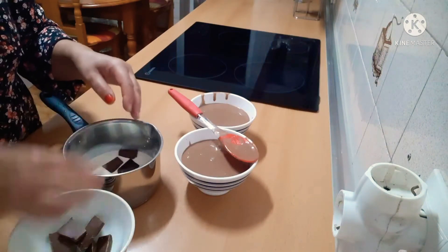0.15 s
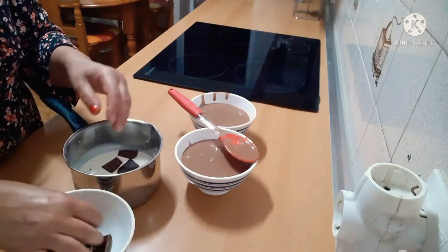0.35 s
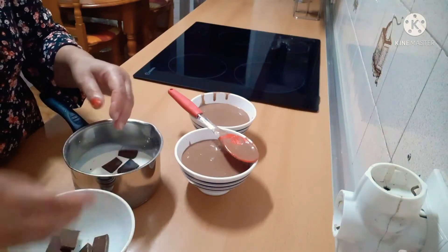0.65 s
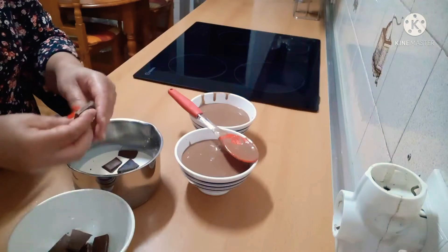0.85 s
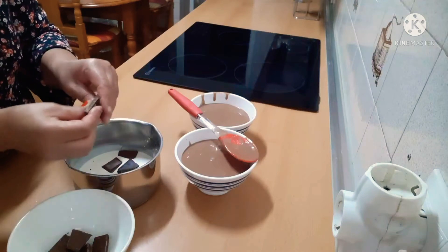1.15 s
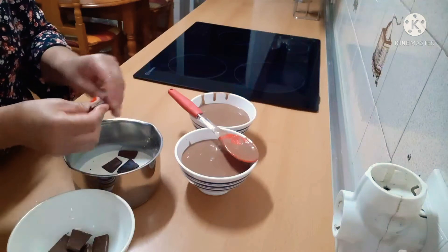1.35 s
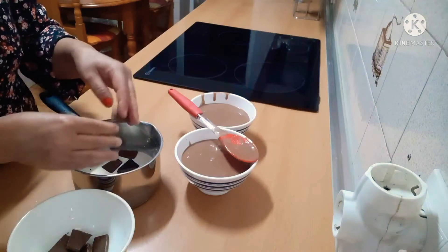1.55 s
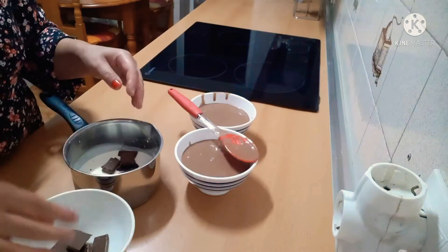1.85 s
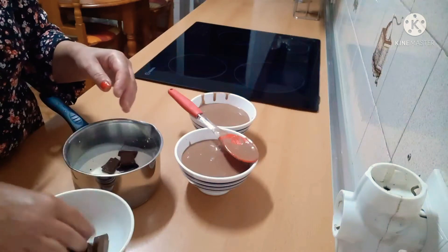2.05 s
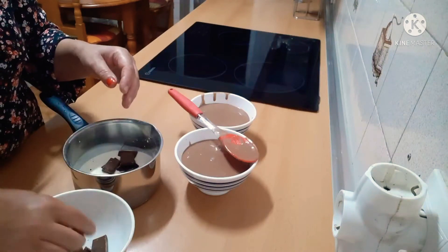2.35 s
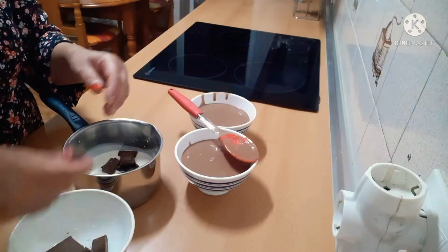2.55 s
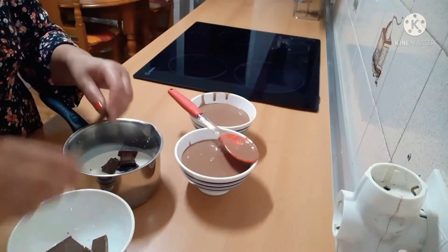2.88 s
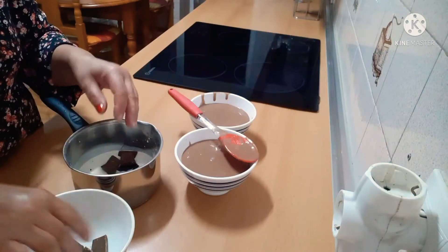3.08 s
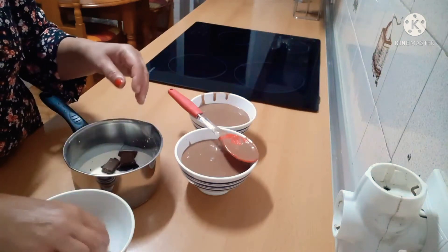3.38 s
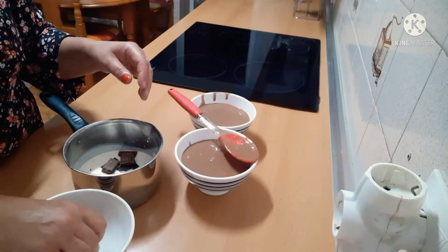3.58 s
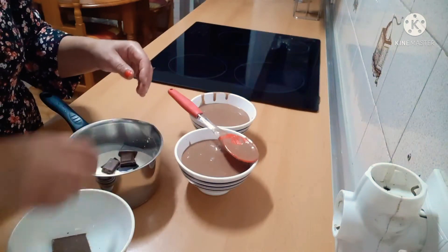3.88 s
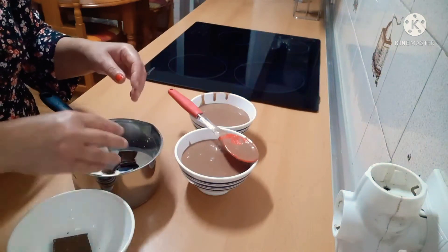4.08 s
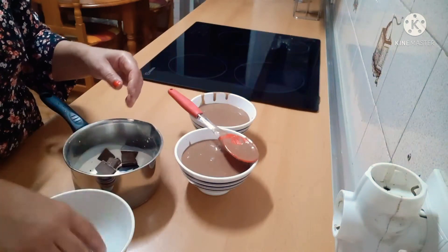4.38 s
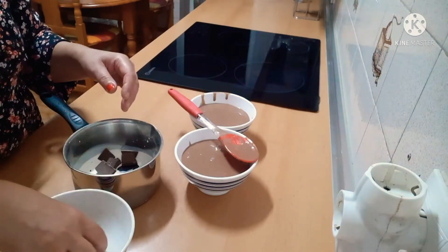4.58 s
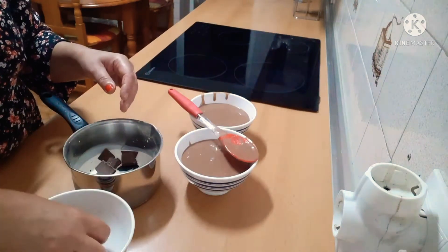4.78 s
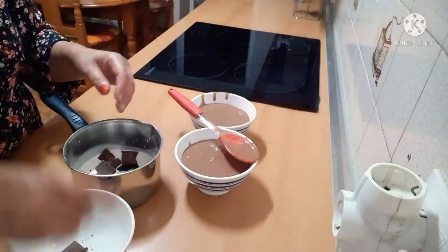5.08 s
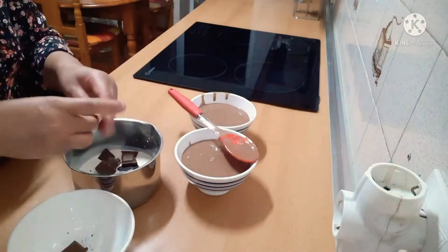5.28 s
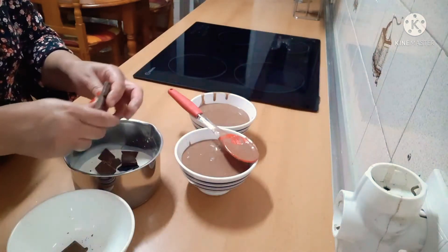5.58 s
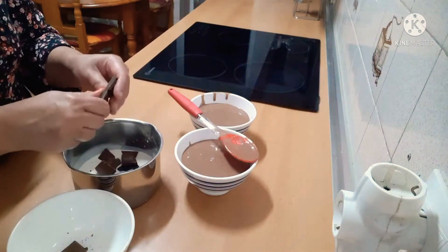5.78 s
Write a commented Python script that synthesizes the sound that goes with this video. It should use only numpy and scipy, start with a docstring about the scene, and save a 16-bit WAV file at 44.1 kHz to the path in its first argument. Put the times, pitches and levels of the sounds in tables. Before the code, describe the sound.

Chocolate pieces snap sharply and clack into a steel saucepan, with china bowl knocks and faint rummaging over a low fridge hum.

```python
"""Sharp cracks, knocks and faint rummaging over a low hum: squares of chocolate are picked out of a china
bowl, snapped and dropped into a steel saucepan on a kitchen counter.
Every blow is a click with a trail of grit that also rings the pan or bowl and drums the counter.
A tiled room smears the blows, a fridge motor beats against the mains hum, and faint chirps come from
far off. A phone with two ports (microphone openings) listens."""
import sys
import numpy as np
from scipy import signal
from scipy.fft import rfft, irfft
from scipy.io import wavfile
from scipy.ndimage import uniform_filter1d, map_coordinates

SR = 44100
rng = np.random.default_rng(int(sys.argv[2]) if len(sys.argv) > 2 else 0)


def store_wav(level_fs):
    """Save 16-bit WAV to argv[1]."""
    pcm = np.round(np.clip(np.atleast_2d(level_fs), -1, 1) * 32767)
    wavfile.write(sys.argv[1], SR, pcm.T.astype(np.int16))


N = 261954
T = np.arange(N) / SR  # time of every sample, in seconds

# notes of the struck counter: (pitch [Hz], relative level [dB], time to fall by 60 dB [s])
COUNTER_MODES = [(149.1, -11.5, 0.11), (184, -1.5, 0.065), (279, -13, 0.072), (313, -7, 0.094),
                 (407.7, -3.5, 0.1), (518.3, 4, 0.059), (644.8, 1.5, 0.074), (805, 2, 0.013),
                 (861.5, -1, 0.037), (1031, 2, 0.018), (1167, -4, 0.024)]
# what rings close to the phone stirs the room less than a crack does
RING_SEND_DB, COUNTER_SEND_DB = -16, -9.5


def undb(db):
    """Turn decibels into a plain multiplier."""
    return 10 ** (np.asarray(db) / 20)


def unit(x):
    """Scale a sound to an average (RMS) level of 1."""
    return x / np.sqrt(np.mean(x ** 2, axis=-1, keepdims=True))


def along(table, hz):
    """Read a (pitch, value) table between its rows, on a log-frequency axis."""
    f, v = np.transpose(table)
    return np.interp(np.log(np.maximum(hz, 1)), np.log(f), v)


def fall(t, t60):
    """A fading level that drops by 60 dB in t60 seconds."""
    return np.exp(-np.log(1000) * t / t60)


def swell(s, length):
    """A level that rises from zero and sinks back, starting at s and lasting length seconds."""
    return np.sin(np.pi * np.clip((T - s) / length, 0, 1))


def band(x, lo_hz, hi_hz):
    """Keep mainly what lies between two pitches."""
    return signal.sosfilt(signal.butter(2, [lo_hz, hi_hz], "band", fs=SR, output="sos"), x)


def octave_share(hz, centre_hz):
    """Share of each pitch in one octave band; neighbouring bands overlap and add up to 1."""
    return np.clip(1 - np.abs(np.log2(np.maximum(hz, 1) / centre_hz)), 0, 1)


def walk(rate):
    """Random levels held for 1 / rate seconds and smoothed twice; spread near 1."""
    k = int(SR / rate)
    steps = np.repeat(rng.standard_normal(N // k + 1), k)
    return 1.26 * uniform_filter1d(uniform_filter1d(steps, k), k)[:N]


def pair(n):
    """Spectra of a left and a right noise: alike in the bass, mostly unrelated higher up."""
    # (pitch [Hz], likeness of left and right [0 to 1])
    likeness = [(130, 1), (290, 0.64), (640, 0.25), (1400, 0.16), (3000, 0.011), (15000, 0.247)]
    hz = np.fft.rfftfreq(n, 1 / SR)
    c = np.clip(along(likeness, hz), -1, 1)
    mid, side = rfft(rng.standard_normal((2, n)))
    mid = mid * np.sqrt((1 + c) / 2)
    side = side * np.sqrt((1 - c) / 2)
    return hz, np.array([mid + side, mid - side])


def causal(db):
    """Short response with the given gains over frequency; folding the cepstrum keeps it from starting early."""
    half = db.shape[-1] - 1
    cep = irfft(np.log(undb(db)))
    cep[..., 1:half] *= 2
    cep[..., half + 1:] = 0
    return irfft(np.exp(rfft(cep)))


def fridge():
    """The motor slips behind the mains, so their second multiples beat; narrow noise bands are the casing's drone."""
    # steady tones: (multiple of the base pitch, level [dB])
    motor_tones = [(1, -72.5), (2, -56.5), (3, -63), (5, -74), (21, -80)]
    mains_tones = [(1, -64), (2, -59.5), (3, -90.5), (4, -67)]
    # (pitch [Hz], width [Hz], level [dB])
    drone_bands = [(65.8, 6.4, -66), (148.8, 2.3, -89.5), (318, 5.1, -75.5), (415, 28, -72.5),
                   (577.7, 13, -81), (1046, 28.4, -107.5)]
    motor_hz, mains_hz = 48.98, 50.005
    t = T - .042  # at .042 s the second multiples cancel most
    motor = sum(undb(db) * np.sin(2 * np.pi * k * motor_hz * t) for k, db in motor_tones)
    mains = sum(undb(db) * np.sin(2 * np.pi * k * mains_hz * t) for k, db in mains_tones)
    drone = sum(undb(db) * unit(band(rng.standard_normal(N), f - w / 2, f + w / 2))
                for f, w, db in drone_bands)
    return np.sqrt(2) * (motor - mains) + drone


def air():
    """The quiet of the kitchen: noise in octave bands that swell a little, each on its own."""
    # (pitch [Hz], relative level per Hz [dB])
    air_colour = [(20, -11), (45, 0), (75, -12), (120, 3), (200, -8), (350, -18), (700, -21), (1500, -30.5),
                  (2800, -37.5), (6000, -36.5), (16000, -44)]
    air_db = -57  # average level
    hz, noise = pair(N)
    noise = noise * undb(along(air_colour, hz))
    out = 0
    for f in 30 * 2. ** np.arange(10):
        swelling_db = 3.2 * walk(3.67) + 0.7 * walk(3.56)
        out = out + irfft(noise * octave_share(hz, f), N) * undb(swelling_db)
    return undb(air_db) * out / np.sqrt(np.mean(out ** 2))


def bumps():
    """Soft bumps of an arm: each slow push rocks the counter at one low note."""
    # (time [s], length [s], pitch [Hz], level [dB])
    arm_bumps = [(.0, 0.11, 119, -41.5), (1.7, 0.2, 97.5, -39.5), (1.75, 0.154, 133.2, -46.5),
                 (2.504, 0.28, 44.4, -46), (2.517, 0.17, 128, -48)]
    return sum(swell(s, length) * undb(db) * np.sin(2 * np.pi * hz * (T - s))
               for s, length, hz, db in arm_bumps)


def ring(modes, t, scatter_db):
    """One blow on a set of fading notes, each met with its own strength, sign and slight mistuning; peak 1."""
    hz, db, t60 = np.transpose(modes)[:, :, None]
    sign, strength, detune = rng.standard_normal((3, len(modes), 1))
    level = np.sign(sign) * undb(db + scatter_db * strength)
    notes = level * np.sin(2 * np.pi * hz * (1 + 0.005 * detune) * t) * fall(t, t60)
    y = np.sum(notes, axis=0)
    return y / np.max(np.abs(y))


def follow(rule, crack_db, ring_db=0):
    """A level set by the crack and ring: rule is (offset dB, dB per dB of crack, dB per dB of ring)."""
    return rule[0] + rule[1] * crack_db + rule[2] * ring_db


def blows(rows, vessel, clack, rock_s, shoulder_db, grit_t60, scatter_db):
    """Each blow is a coloured click with gritty trail; it rings the vessel, and the rocking piece drums the counter."""
    # broad thud of one contact: (pitch [Hz], relative level [dB])
    contact_thud = [(80, 14.5), (300, 21.5), (900, 2.5), (1500, 17), (2500, -10.5), (8000, -17.5)]
    t = np.arange(SR // 3) / SR
    to_room, near = np.zeros(N + SR), np.zeros((2, N + SR))
    hz = np.fft.rfftfreq(512, 1 / SR)
    for s, crack_db, crack_hz, edge_db, counter_db, ring_db, pan_db in rows:
        clack_db = follow(clack, crack_db, ring_db)  # the lower, duller part of the click
        colour = [(90, clack_db - 7), (300, clack_db + 14.0), (2500, clack_db + 10.5),
                  (0.76 * crack_hz, crack_db - 5.5), (crack_hz, crack_db + 3.5),
                  (1.41 * crack_hz, crack_db + shoulder_db),
                  (12000, edge_db + 17.0), (16000, edge_db + 2.0)]
        click = .1 * rng.standard_normal(len(t)) * fall(t, grit_t60)
        click[0] = 1
        crack = signal.fftconvolve(click, causal(along(colour, hz)))[:len(t)]
        # uneven contacts that grow and die out as the weight settles
        u = t / rock_s
        contacts = rng.standard_normal(len(t)) ** 3 * u * np.exp(-u)
        contacts /= np.sqrt(np.sum(contacts ** 2))
        # the landing: one firm contact
        contacts[int(rock_s * SR / 2)] += undb(1.0)
        thud = ring(COUNTER_MODES, t, scatter_db)
        thud[:512] += causal(along(contact_thud, hz))
        counter = undb(counter_db) * signal.fftconvolve(thud, contacts)[:len(t)]
        rings = undb(ring_db) * ring(vessel, t, scatter_db)
        i = int(s * SR)
        to_room[i:i + len(t)] += crack + undb(RING_SEND_DB) * rings + undb(COUNTER_SEND_DB) * counter
        left_right = undb(np.array([[pan_db], [-pan_db]]) / 2)
        near[:, i:i + len(t)] += (crack + rings + counter) * left_right
    return to_room[:N], near[:, :N]


def pan_drops():
    """Pieces snapped over the steel pan or landing in it: bright cracks with the pan's ring."""
    # (time [s], crack level before colouring [dB], crack pitch [Hz], bright edge before colouring [dB],
    #  pan ring [dB], left minus right [dB])
    pan_hits = [(0.0122, -22.5, 5070, -49, -42, -7), (0.0336, 0.5, 6540, -27.5, -47.5, -20.5),
                (0.0451, -29, 4840, -31, -35, 4), (0.0564, -18.5, 5600, -31, -31.5, -3),
                (0.0855, -26, 5340, -41, -50, 0), (0.1861, -25, 5000, -65, -43.5, 11),
                (1.26, -19, 4780, -36.5, -46, -3.5), (1.6792, -42.5, 5070, -79, -45, 7),
                (1.698, -37.5, 4400, -64, -39, -1.5), (1.7276, -27.5, 4600, -53, -38, 15.5),
                (1.7321, -18, 4260, -45.5, -28, -1), (1.7492, -24.5, 5360, -47, -33.5, -17),
                (1.8423, -33.5, 6100, -70, -40, -7), (1.8523, -31, 5300, -70, -44.5, -7),
                (1.8857, -49, 4330, -78, -48, -1), (3.091, -22, 5300, -53, -37, -2),
                (3.1007, -1.5, 5440, -39.5, -31, -4), (4.1836, -8.5, 5700, -39, -37.5, -11.5),
                (4.2224, -9.5, 5220, -33, -41.5, 15), (4.2492, -19.5, 4770, -58, -44, 9)]
    # notes of the pan: (pitch [Hz], relative level [dB], time to fall by 60 dB [s])
    pan_modes = [(1455, -6.5, 0.18), (1513, -3, 0.19), (1581, 0.5, 0.042)]
    clack, counter = (-8, 0.29, 0.39), (-27, 0.22, 0.23)  # rules for follow()
    rows = [(s, db, hz, edge_db, follow(counter, db, ring_db), ring_db, pan_db)
            for s, db, hz, edge_db, ring_db, pan_db in pan_hits]
    return blows(rows, pan_modes, clack, rock_s=0.00543, shoulder_db=0, grit_t60=0.0067, scatter_db=0.0)


def bowl_knocks():
    """Pieces knocking in the china bowl: harder cracks also brighten the edge and ring the bowl more."""
    # (time [s], crack level before colouring [dB], crack pitch [Hz], counter drive [dB], left minus right [dB])
    bowl_hits = [(0.3956, -44.5, 5000, -47, 13.5), (0.4228, -24, 4760, -27, -3),
                 (0.4902, -25.5, 4900, -41.5, 15), (0.5295, -38, 4750, -40.5, -12),
                 (2.103, -47, 4710, -40, 1.5), (2.151, -29.5, 4570, -35.5, 5),
                 (2.1652, -23.5, 4560, -18.5, 11), (2.387, -41.5, 4630, -45, 5),
                 (2.4526, -20.5, 4200, -26.5, 5), (3.3536, -47.5, 5030, -47, 0),
                 (3.4853, -58, 4330, -49.5, 11), (3.53, -53, 4950, -45, 8), (3.6031, -44, 4800, -42.5, 3),
                 (3.6891, -56, 5000, -43, 0), (3.7309, -43.5, 5560, -52, -3), (4.4568, -52, 5040, -49, -1),
                 (4.5125, -25.5, 4190, -38.5, 8), (4.5397, -47.5, 4400, -32, 5),
                 (4.5694, -43.5, 4590, -38, 3), (4.6052, -37, 4240, -43, -7),
                 (4.6269, -43, 4130, -35, 17.5), (4.741, -57, 4300, -40, 1),
                 (4.7699, -65, 4600, -41.5, -11), (4.8494, -51, 4990, -49.5, 0),
                 (4.8804, -28, 4244, -43, -1), (4.93, -44, 4230, -44.5, -18.5)]
    # notes of the bowl: (pitch [Hz], relative level [dB], time to fall by 60 dB [s])
    bowl_modes = [(1930, -10, .02), (2054, 39, 0.063), (2350, -34, 0.1), (2510, -48, 0.049)]
    clack, edge, ringing = (-0.5, 1.194, 0), (-28.5, 0.89, 0), (-16, 1.064, 0)  # rules for follow()
    rows = [(s, db, hz, follow(edge, db), counter_db, follow(ringing, db), pan_db)
            for s, db, hz, counter_db, pan_db in bowl_hits]
    return blows(rows, bowl_modes, clack, rock_s=0.00715, shoulder_db=-7, grit_t60=0.011, scatter_db=1.5)


def rummage():
    """Fingers among the pieces: small random contacts, some firmer, drum the counter through the bowl and tick."""
    # (time [s], length [s], level of the smallest contacts [dB])
    rummage_spells = [(0.416, .22, -57.5), (2.184, 0.27, -53), (3.44, 0.23, -59), (4.52, .45, -57)]
    contacts_per_s, scatter_db = 200, 3
    tick_hz, tick_db = 4800, -17
    t = np.arange(SR // 8) / SR
    chance, size = rng.random(N), rng.exponential(size=N)
    effort = sum(swell(s, length) * undb(db) for s, length, db in rummage_spells)
    contacts = (chance < contacts_per_s / SR) * undb(scatter_db * size) * effort
    ticks = undb(tick_db) * band(contacts, .8 * tick_hz, 1.05 * tick_hz)
    drum = signal.fftconvolve(contacts, ring(COUNTER_MODES, t, 1.5))[:N]
    return drum, ticks


def chirps():
    """Short rough whistles made of narrow noise, heard only through the room."""
    # far chirps: (time [s], length [s], pitch [Hz], level sent to the room [dB])
    far_chirps = [(0.75, 0.075, 5840, -83.5), (0.794, 0.074, 5540, -96), (1.145, 0.047, 4840, -86),
                  (3.776, 0.025, 4290, -82.5), (3.878, 0.043, 5300, -83), (3.944, 0.085, 5600, -98),
                  (5.087, 0.025, 5030, -81.5), (5.443, 0.055, 5600, -85.5), (5.577, 0.055, 4900, -78.5),
                  (5.892, 0.052, 4370, -79.5)]
    return sum(swell(s, length) * undb(db) * unit(band(rng.standard_normal(N), 0.91 * hz, 1.1 * hz))
               for s, length, hz, db in far_chirps)


def room(x):
    """Spiky early echoes off counter and tiles, then a dense tail that loses its treble first."""
    # (pitch [Hz], time to fall by 60 dB [s])
    room_fade = [(150, 0.46), (600, 0.44), (1500, 0.56), (4000, 0.47), (10000, 0.37)]
    tail_db, early_db, early_t60_s = 7, 7, 0.077
    n = SR
    t, tail = np.arange(n) / SR, 0
    hz, noise = pair(n)
    for f in 60 * 2. ** np.arange(9):
        tail = tail + irfft(noise * octave_share(hz, f), n) * fall(t, along(room_fade, f))
    tail = unit(tail * np.clip(t / 0.019, 0, 1))
    # the fifth power turns smooth noise into sparse spikes
    spikes = band(rng.standard_normal((2, n)) ** 5, 260, 19000)
    early = unit(spikes * fall(t, early_t60_s) * (t > .0015))
    echo = (undb(tail_db) * tail + undb(early_db) * early) / np.sqrt(n)
    return signal.fftconvolve(x[None], echo, axes=1)[:, :N]


def scene():
    """Mix the close sounds, their echo in the room and the steady background."""
    right_late_s = 0.00012  # direct sound reaches the left port first
    side_from_hz = 360  # well below this both ports hear the close sounds the same
    pan, pan_near = pan_drops()
    bowl, bowl_near = bowl_knocks()
    drum, ticks = rummage()
    to_room = pan + bowl + undb(COUNTER_SEND_DB) * drum + ticks + chirps()
    near = pan_near + bowl_near + drum + ticks
    near[1] = map_coordinates(near[1], [(T - right_late_s) * SR])
    mid, side = (near[0] + near[1]) / 2, (near[0] - near[1]) / 2
    side = signal.sosfilt(signal.butter(2, side_from_hz, "high", fs=SR, output="sos"), side)
    close = np.array([mid + side, mid - side])
    return close + bumps() + room(to_room) + fridge() + air()


def record(dry):
    """Each port boosts the range around 5 kHz and dips above it; the loudest peaks are rounded and the top is cut."""
    # tone of both ports: (pitch [Hz], gain [dB])
    port_tone = [(20, -5), (2500, 6), (3600, 14), (5000, 15.5), (6000, 12.5), (6800, 5), (7600, -6.5),
                 (8600, -21.5), (9800, -8), (10500, 0), (12000, 7), (15300, 1), (15900, -14.5)]
    # how the ports differ: (pitch [Hz], left minus right [dB])
    port_sides = [(60, 2), (400, 0.7), (1300, 4), (2400, 0), (4400, 0), (8100, -14), (15000, 7.5)]
    top_hz = 15900
    hz = np.fft.rfftfreq(1024, 1 / SR)
    ports = causal(along(port_tone, hz) + np.array([[.5], [-.5]]) * along(port_sides, hz))
    y = signal.fftconvolve(dry, ports, axes=1)[:, :N]
    rounded = .75 * np.tanh(y / .75)
    return signal.sosfilt(signal.ellip(8, .2, 70, top_hz, fs=SR, output="sos"), rounded)


dry = scene()
out = record(dry)
store_wav(out)
```